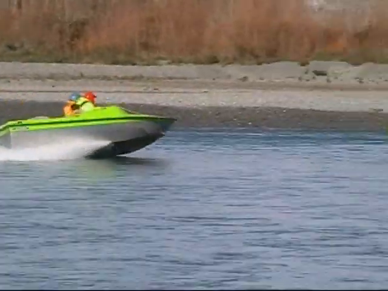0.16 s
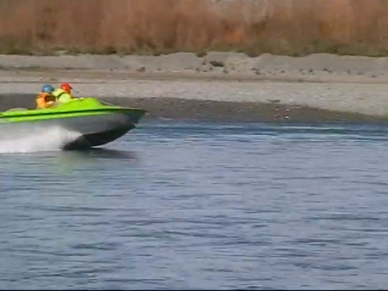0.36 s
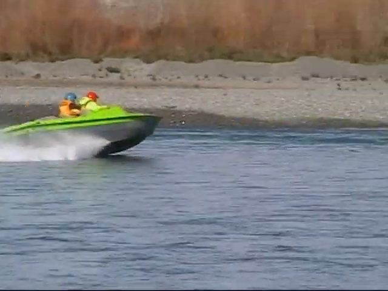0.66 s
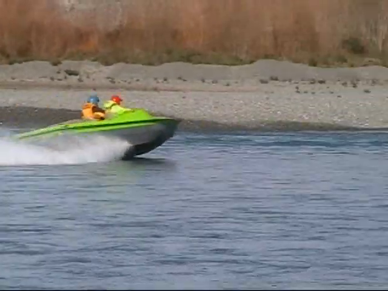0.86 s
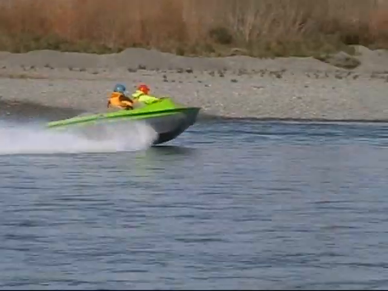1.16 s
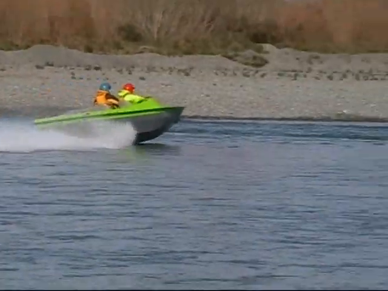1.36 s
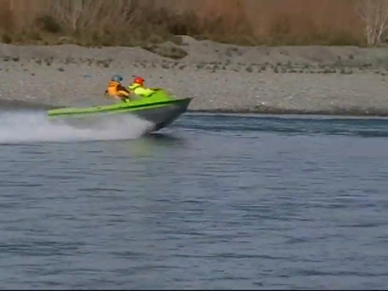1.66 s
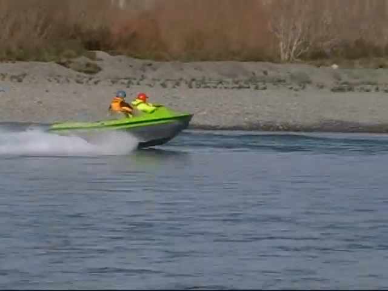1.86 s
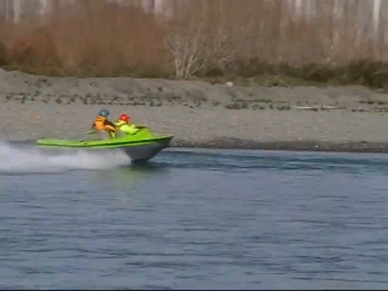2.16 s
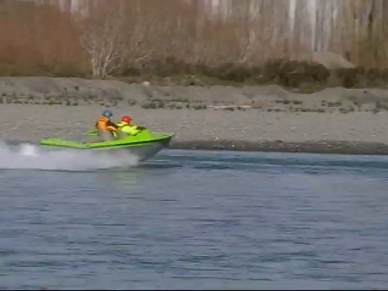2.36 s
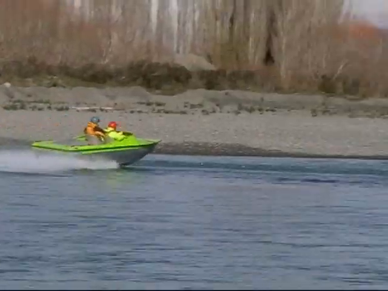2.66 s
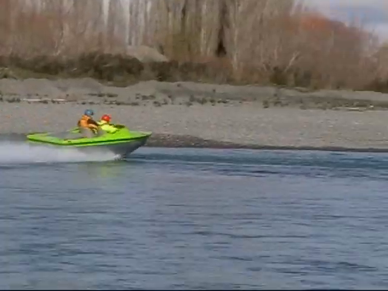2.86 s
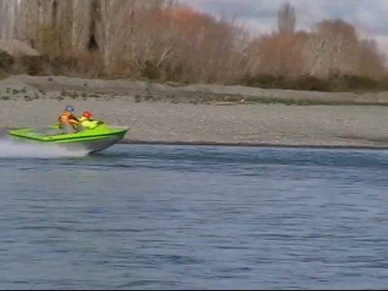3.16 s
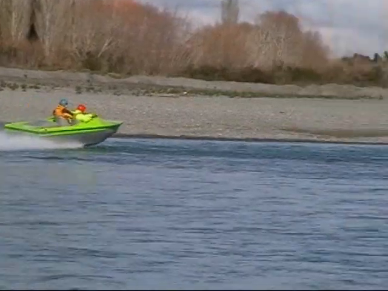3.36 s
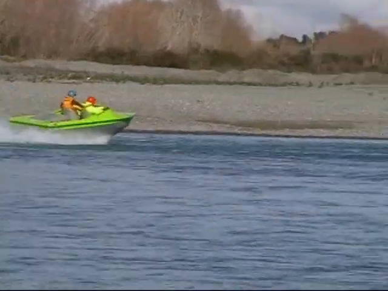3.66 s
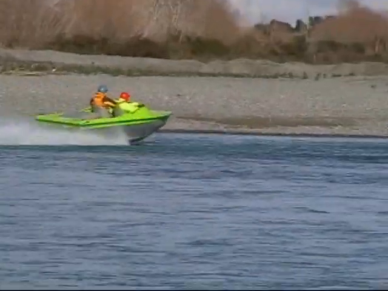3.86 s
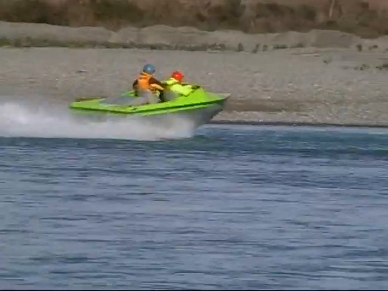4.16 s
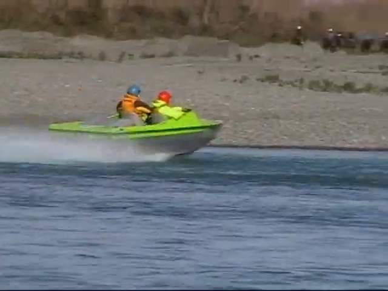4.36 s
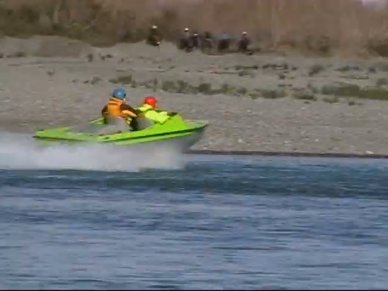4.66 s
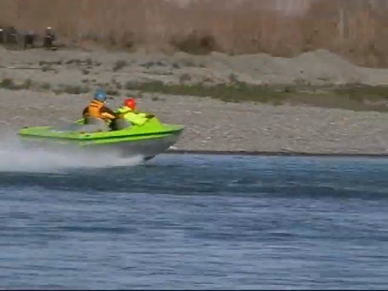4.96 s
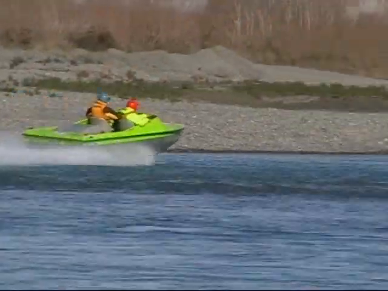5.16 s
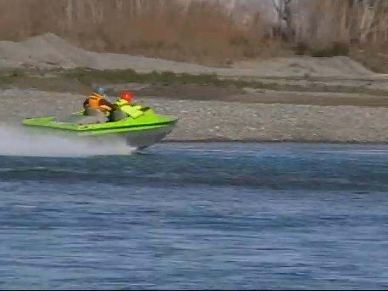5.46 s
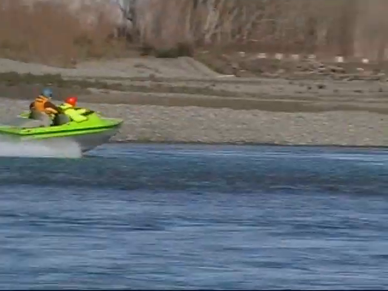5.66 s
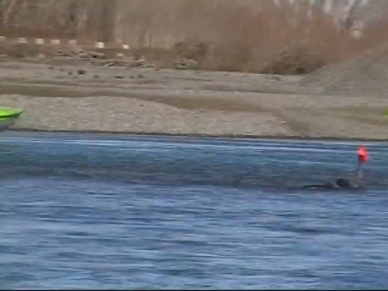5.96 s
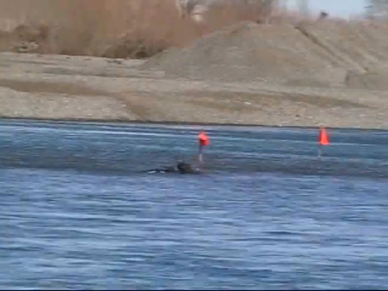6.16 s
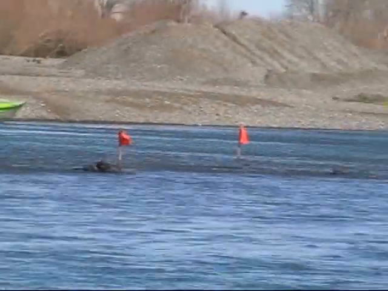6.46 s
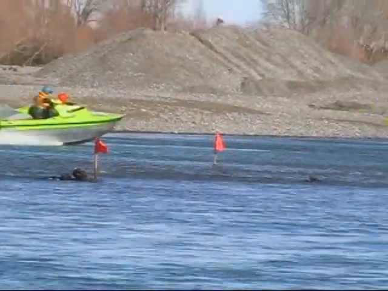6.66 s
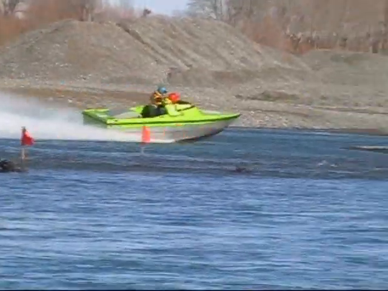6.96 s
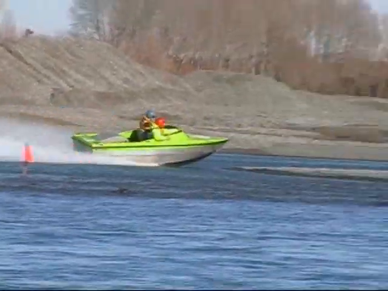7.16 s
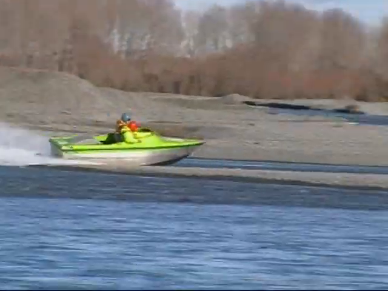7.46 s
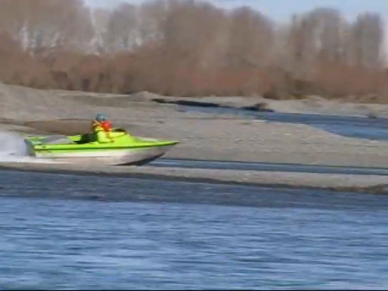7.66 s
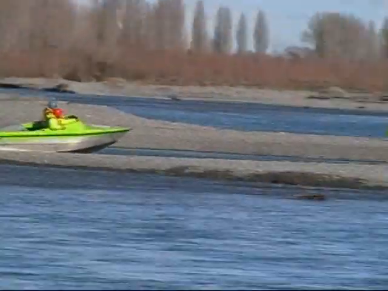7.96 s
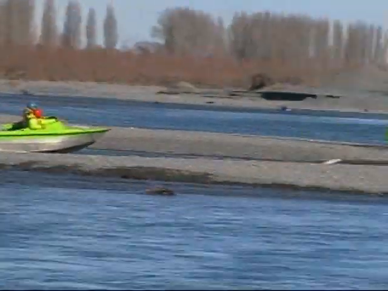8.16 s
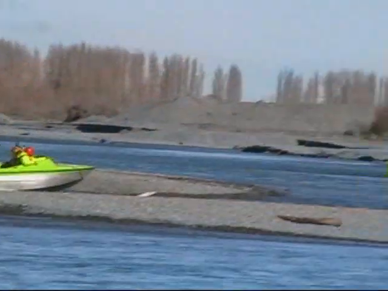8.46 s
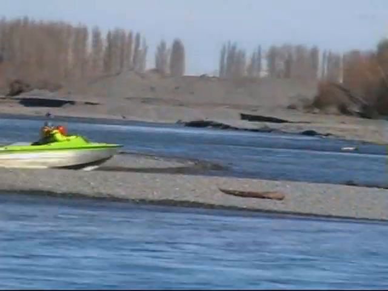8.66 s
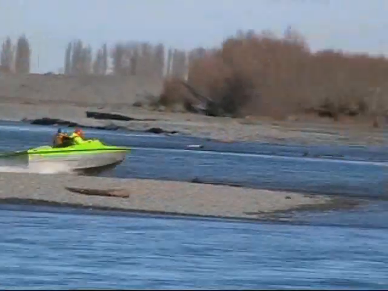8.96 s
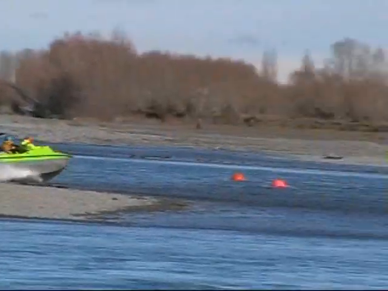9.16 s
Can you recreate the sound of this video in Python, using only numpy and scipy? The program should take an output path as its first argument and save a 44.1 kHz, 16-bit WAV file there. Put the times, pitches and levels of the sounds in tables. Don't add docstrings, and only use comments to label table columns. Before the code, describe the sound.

From an open riverbank, a jet boat with open eight-cylinder exhaust roars past without stopping. A deep, buzzing drone holds nearly steady, sagging slightly in pitch midway then creeping back up. Rough barks and metallic pipe rings ride over it, with spray hiss bright at first, duller as it draws off, then fresher splashes near the end. Light wind bumps the microphone.

```python
import sys
import numpy as np
from scipy import signal
from scipy.io import wavfile

SR = 44100
rng = np.random.default_rng(int(sys.argv[2]) if len(sys.argv) > 2 else 0)


def dump_mix(stems):
    frames = np.atleast_2d(stems).T
    limited = np.clip(frames, -1, 1)
    pcm = np.round(limited * 32767).astype(np.int16)
    wavfile.write(sys.argv[1], SR, pcm)


def field_ratio(decibels):
    return 10 ** (np.asarray(decibels, dtype=float) / 20)


N = 410571

# place [cycles, 0-1], level_db [dB], crack_db [dB]
BLOW_DOWNS = [
    (.925, -1, 7),
    (.47, -3.5, -9.5),
    (.12, -5.5, -17.5),
    (0.5, -20.5, -10),
    (0.5, -21, -17.5),
]
# time_s [s], share [0-1]
MOUTH_FACING = [(0, 0), (1.5, 0.38), (1.9, 0.72), (2.6, 1), (6.2, 1), (6.8, 0.96), (7.4, 1), (8.2, 0.55),
                (9.31, 0.09)]
# time_s [s], gain_db [dB]
DISTANCE_LOSS = [(0, 0), (1.1, -2.5), (2.4, -3.5), (3.8, -9), (5.4, -12), (6.5, -14.5), (7.8, -9),
                 (8.3, -7), (9.31, -10)]
# time_s [s], half_length_s [s], jet_swell_db
# [dB], splash_db [dB], splash_hz [Hz]
WATER_SHEETS = [(.2, .25, -1, -41, 3200), (1.4, 0.11, 4, -36.5, 2860), (1.8, 0.47, -1, -43.5, 2850),
                (2.05, 0.053, 0.5, -50, 4300), (2.5, 0.027, 5, -53, 4960), (2.91, 0.049, 5, -42, 4540),
                (3.5, 0.27, 0, -52.5, 3300), (4.0, .1, 1, -47.5, 3500), (4.355, 0.078, 4.5, -42.5, 3850),
                (3.74, 0.14, -3, -45.5, 1650), (4.406, 0.33, 2.5, -43.5, 1570), (5.5, 0.18, 4, -51.5, 3400),
                (5.7, 0.044, -4, -73, 3500), (5.93, 0.082, 4, -58, 3300), (6.26, 0.071, 3, -61, 3500),
                (7.33, 0.22, 0, -45, 3550), (8.02, .06, -1, -40.5, 3750), (8.25, 0.19, -0.5, -39, 3300),
                (8.3, 0.23, 4.5, -45, 1780), (8.72, 0.11, 8.5, -39.5, 3630), (8.75, .2, 0.5, -43, 1900),
                (8.88, 0.054, -1, -38.5, 4200), (9.1, 0.18, 1.5, -46, 4500)]


def in_time(rows):
    s, *columns = np.transpose(rows)
    return [np.interp(np.arange(N) / SR, s, c) for c in columns]


def swells(rows):
    t, out = np.arange(0, N, 64) / SR, 0
    for s, half_s, *sizes in rows:
        hump = np.exp(-((t - s) / half_s) ** 2)
        out = out + np.outer(sizes, hump)
    return [np.interp(np.arange(N) / SR, t, track) for track in out]


def rms_one(x):
    return x / np.sqrt(np.mean(x ** 2) + 1e-20)


def drift(rate):
    r = np.exp(-80 * np.pi * rate / SR)
    white = rng.standard_normal(N // 40 + 2002)
    slow = signal.lfilter([1], [1, -2 * r, r * r], white)[2000:]
    return np.interp(np.arange(N) / 40, np.arange(len(slow)), rms_one(slow))


def band(x, low_hz, high_hz):
    return signal.sosfilt(signal.butter(2, [low_hz, high_hz], "band", fs=SR, output="sos"), x)


def banded_noise(spectrum, low_hz, count, patchy_db, extra_db):
    edges = low_hz * 2 ** (np.arange(count + 1) / 3)
    point_hz, point_db = np.transpose(spectrum)
    white, together = rng.standard_normal((2, N)), drift(16.0)
    out, power = 0, 0
    for k, (low, high) in enumerate(zip(edges, edges[1:])):
        hz = np.sqrt(low * high)
        level_db = np.interp(np.log(hz), np.log(point_hz), point_db)
        part = field_ratio(level_db) * band(white[k % 2], low, high)
        power += np.mean(part ** 2)
        flicker_db = patchy_db * (.4 * together + drift(2.3))
        out = out + part * field_ratio(extra_db(hz) + flicker_db)
    return out / np.sqrt(power)


def both_db(a_db, b_db):
    return 10 * np.log10(field_ratio(2 * a_db) + field_ratio(2 * b_db))


def exhaust():
    # time_s [s], rate_hz [cycles/s]
    revs = [(0, 38.3), (.65, 38.1), (1.35, 37.91), (2.05, 37.63), (2.4, 37.51), (2.75, 37.53), (3.8, 37.38),
            (4.5, 37.23), (4.8, 37.18), (5.05, 37.25), (5.5, 37.17), (6.25, 37.2), (6.8, 37.26),
            (7.1, 37.13), (7.65, 37.49), (8.35, 37.79), (8.7, 37.84), (9.31, 37.9)]
    # time_s [s], edge_hz [Hz], leak_db round the edge [dB], tilt_db [dB/octave]
    shade = [(0, 745, 0, 1), (.4, 730, 2, 1), (.9, 674, 0.5, -1), (1.4, 694, -24, -1), (2.2, 700, -14, 0),
             (2.6, 750, -12, 0), (3.5, 763, -8, 1.5), (4.3, 915, -14, -2), (5, 980, -13, -4),
             (5.5, 1060, -14, -0.5), (6, 1050, -20, -2.5), (6.6, 1090, -19, 0.5), (7.1, 1270, -26, 0),
             (7.9, 1350, -17, -2), (8.3, 905, -30, 1.5), (8.7, 880, -4.5, -6), (9.31, 740, -5, -4)]
    # time_s [s], level_db [dB]
    loudness = [(0.0, -9), (0.02, -11.5), (0.77, -10.5), (2.59, -11), (2.9, -14), (5.03, -14), (5.16, -18),
                (5.5, -12.5), (5.88, -17), (6.12, -14.5), (6.66, -15.5), (6.95, -13.5), (7.26, -19),
                (7.68, -13), (7.98, -14), (8.4, -10.5), (9.21, -10.5), (9.31, -9.5)]
    # time_s [s], half_length_s [s], gain_db [dB]
    beats = [(.3, .15, 3), (1.5, 0.18, 6), (2.4, 0.24, -4), (3.4, 0.54, 3), (4.2, .12, -3),
             (4.54, 0.063, 7.5), (5.15, 0.077, 7), (5.75, .08, 6), (6.2, 0.37, 2.5), (6.82, 0.087, 4.5),
             (6.98, 0.045, 2), (7.67, 0.08, 1.5), (8.0, 0.15, 4), (8.77, 0.073, -16), (9.0, 0.11, -17.5),
             (9.3, .1, 1.5)]
    # pitch_hz [Hz], density_db [dB per Hz]
    roar_spectrum = [(60, -44), (85, -20.5), (120, -13), (200, 0.5), (300, 2.5), (500, 2.5), (800, -5.5),
                     (1300, -25), (2200, -8.5)]

    rate, = in_time(revs)
    shading = in_time(shade)
    turns = .15 + np.cumsum(rate) / SR
    bark_db, elbow_db, tail_db, crack_db = mouth(shading[0])

    (fifth_db,), (facing,) = in_time(loudness), in_time(MOUTH_FACING)
    third_db = -26 - 9 * facing
    sixth_db = fifth_db - 11 + swells(beats)[0] + 1.5 * drift(6.0)
    low_orders = boom(turns, [third_db, fifth_db, sixth_db])

    soft = blow_downs(turns, column=1, spread_db=1.5)
    sharp = blow_downs(turns, column=2, spread_db=1.3)
    roar = banded_noise(roar_spectrum, 57.46, count=16, patchy_db=1.5,
                        extra_db=lambda hz: shade_db(hz, *shading))
    gusty_roar = roar * puffs(soft, decay_s=.006, steady=4)
    barking = field_ratio(-4.0) * bark(turns, rate, shading) + field_ratio(-6.5) * gusty_roar

    elbow = field_ratio(elbow_db - 5) * pipe(soft, 800, 1100, hiss_db=-3)
    tail = field_ratio(tail_db - 1) * pipe(soft + .6 * sharp, 1170, 1520, hiss_db=-4)
    spit = rng.standard_normal(N) * puffs(sharp, decay_s=0.0013, steady=.02)
    spit = rms_one(band(spit, 2200, 5800))
    crack = field_ratio(crack_db - 4) * (pipe(sharp, 1970, 2786, hiss_db=6.0) + field_ratio(-11.5) * spit)
    return low_orders + field_ratio(bark_db) * barking + elbow + tail + crack


def boom(turns, levels_db):
    favoured = [
        (3, .14),
        (5, 0),
        (6, .7),
    ]
    # order [per cycle], level_db [dB]
    faint = [(2, -53.5), (4, -44)]
    out = sum(field_ratio(db) * np.cos(2 * np.pi * k * turns) for k, db in faint)
    for (k, lead), db in zip(favoured, levels_db):
        phase = 2 * np.pi * (k * turns + lead) + 0.051 * drift(1.9)
        out = out + field_ratio(db + .5 * drift(27.0)) * np.cos(phase)
    return np.sqrt(2) * out


def bark(turns, rate, shading):
    # order [per cycle], level_db [dB]
    orders = [(1, -52), (2, -36), (3, -21), (4, -26), (5, 0), (6, -8), (7, -18.5), (8, -12), (9, -18),
              (10, -9.5), (11, -7.5), (12, -29.5), (13, -8), (14, -24.5), (15, -14.5), (16, -23),
              (17, -11.5), (18, -14.5), (19, -21.5), (20, -18.5), (21, -32.5), (22, -18), (23, -37.5),
              (24, -45.5), (25, -33.5), (26, -27.5), (27, -35.5), (28, -22.5), (29, -45), (30, -28.5),
              (31, -32.5), (32, -38.5), (33, -35.5), (34, -47.5), (35, -34.5), (36, -50.5), (37, -47),
              (38, -47)]
    out, top_db = 0, max(db for k, db in orders if k > 6)
    shiver = turns + .001 * drift(25)
    for k, db in orders[6:]:
        pair = sum(field_ratio(size) * np.exp(-2j * np.pi * k * place) for place, size, _ in BLOW_DOWNS[:2])
        waver_db, waver_rad = 1.4 * drift(2.5), .55 * drift(.8)
        shading_db = shade_db(k * rate, *shading) - shade_db(k * 34.7, 1050, -18, 0)
        phase = 2 * np.pi * k * shiver + np.angle(pair) + 14.7 / k + waver_rad
        out = out + field_ratio(db - top_db + shading_db + waver_db) * np.cos(phase)
    return out


def blow_downs(turns, column, spread_db):
    clicks = np.full(N, 1e-18)
    chance = rng.standard_normal((int(turns[-1]) + 2, len(BLOW_DOWNS), 2))
    for j, row in enumerate(BLOW_DOWNS):
        due = np.arange(len(chance)) + row[0] + 0.00056 * chance[:, j, 0]
        inside = due < turns[-1]
        at = np.searchsorted(turns, due[inside])
        clicks[at] += field_ratio(row[column] + spread_db * chance[inside, j, 1])
    return clicks


def puffs(clicks, decay_s, steady):
    rush = signal.lfilter([1], [1, -np.exp(-1 / (decay_s * SR))], clicks)
    return rms_one(rms_one(rush) + steady)


def pipe(clicks, low_hz, high_hz, hiss_db):
    blown = band(band(rng.standard_normal(N), low_hz, high_hz), 0.97 * low_hz, 1.13 * high_hz)
    struck = band(band(clicks, low_hz, high_hz), 0.81 * low_hz, 1.13 * high_hz)
    hiss = field_ratio(hiss_db) * rms_one(blown) * puffs(clicks, decay_s=0.0012, steady=1.7)
    return rms_one(rms_one(struck) + hiss)


def mouth(edge_hz):
    # time_s [s], half_length_s [s], bark_db [dB], ring_db [dB], crack_db [dB]
    lifts = [(.4, 0.081, -1, 2, 2), (.65, .15, -2.5, 6.5, 6.5), (1.01, 0.18, 0.5, 4.5, -1.5),
             (1.37, 0.17, 1.5, 5, -4.5), (2.05, 0.17, -1.5, 2, -2.5), (2.55, 0.078, 2.5, -0.5, 7.5),
             (3.2, .2, 0, 5, 1), (3.48, 0.099, -0.5, -3.5, -7), (4.2, 0.048, 3, -3, -2),
             (8.07, .08, 0, -0.5, 2), (5.75, 0.052, -3.5, -15, -1), (4.65, 0.1, 2.5, 6, 8.5),
             (4.95, 0.13, -1, -3.5, 4.5), (5.18, 0.13, -1, -0.5, 10.5), (5.5, 0.22, 1.5, -1, 11),
             (5.92, 0.094, 1, 8.5, 12.5), (6.15, 0.14, 1, -4, 8.5), (6.99, 0.023, -0.5, 5.5, 3),
             (7.2, 0.04, 1.5, 8, -12), (7.79, 0.091, 0, 6.5, -1), (8.25, 0.067, -2.5, 1.5, 3.5),
             (8.79, 0.17, 0.5, 1, 3.5), (8.95, 0.13, 1.5, -1, 1.5), (9.25, 0.069, -1, 4.5, 11.5)]
    (facing,), (far_db,) = in_time(MOUTH_FACING), in_time(DISTANCE_LOSS)
    bark_lift, ring_lift, crack_lift = swells(lifts)
    elbow_fading_db = -19 - 12 * np.arange(N) / SR
    elbow_db = both_db(elbow_fading_db, -31 + shade_db(980, edge_hz, -24, 0))
    tail_db = both_db(-28 + 2.3 * far_db, -41.5 + shade_db(1400, edge_hz, -31.5, 0))
    bark_db = -23.5 + 5.5 * facing + bark_lift
    crack_db = -35 + 0.81 * far_db + crack_lift
    return bark_db, elbow_db + ring_lift, tail_db + 1.3 * ring_lift, crack_db


def shade_db(hz, edge_hz, leak_db, tilt_db):
    passed = 1 / (1 + (hz / edge_hz) ** 15.4)
    slope_db = tilt_db * np.log2(np.clip(hz, 200, 900) / 450)
    return 10 * np.log10(passed + field_ratio(2 * leak_db)) + slope_db


def spray():
    # pitch_hz [Hz], density_db [dB per Hz]
    hiss_spectrum = [(700, -8.5), (1100, -13), (1400, -17.5), (1750, -4.5), (2300, -23), (3500, -11),
                     (5000, -13.5), (6500, -17), (7500, -28), (8300, -39)]
    # time_s [s], extra path_ms [ms], strength [0-1]
    mirror = [(0, .66, .1), (1.2, .6, 0), (2, .565, 0.4), (2.7, 0.516, 0.6), (3.5, .475, 0.66),
              (3.7, .46, .1), (3.9, 0.25, .15), (5.2, 0.28, 0.2), (6.4, .24, 0.7), (6.7, .25, 0.2),
              (6.9, 0.39, 0.4), (7.5, 0.33, 0.13), (9.31, 0.48, 0.03)]
    (far_db,), (jet_lift,) = in_time(DISTANCE_LOSS), swells([row[:3] for row in WATER_SHEETS])
    level_db, splash_db = -39 + far_db + jet_lift, -38 + 0.55 * far_db
    tilt_db = 1.6 + 0.32 * far_db - 0.26 * np.arange(N) / SR
    hiss = banded_noise(hiss_spectrum, 738, count=11, patchy_db=1.56,
                        extra_db=lambda hz: tilt_db * np.log2(max(hz, 2500) / 5000))

    path_ms, strength = in_time(mirror)
    mirrored = np.interp(np.arange(N) - path_ms * SR / 1000, np.arange(N), hiss)
    glance = signal.butter(2, [2400, 7200], "band", fs=SR, output="sos")
    combed = hiss - np.clip(strength, 0, 1) * signal.sosfiltfilt(glance, mirrored)
    splash = rms_one(band(rng.standard_normal(N), 2800, 4200))
    return field_ratio(level_db + 4.0) * combed + field_ratio(splash_db - 9) * splash + sheets()


def sheets():
    t, wet, out = np.arange(N) / SR, rng.standard_normal(N), 0
    for s, half_s, _, db, hz in WATER_SHEETS:
        hump = np.exp(-((t - s) / half_s) ** 2)
        out = out + field_ratio(db) * hump * rms_one(band(wet, hz / 1.14, hz * 1.14))
    return out


def slap():
    # start_s [s], peak_db [dB], low_hz [Hz], high_hz [Hz]
    knocks = [
        (8.012, -27, 1284, 2030),
    ]
    out, wet = 0, rng.standard_normal(N)
    for s, db, low_hz, high_hz in knocks:
        t = np.arange(N) / SR - s
        decay = (t > 0) * np.exp(-np.abs(t) / 0.0064)
        out = out + field_ratio(db) * decay * rms_one(band(wet, low_hz, high_hz))
    return out


def wind():
    # time_s [s], level_db [dB]
    breeze = [(0, -60), (1, -73.5), (3, -77), (5.5, -63), (7.6, -52.5), (8.4, -56.5), (9.31, -64)]
    # time_s [s], half_length_s [s], gain_db [dB]
    gusts = [(0, 0.089, 14), (.4, .2, 16), (1.2, .25, 8.5), (.67, .06, 17), (1.89, 0.17, 14.5),
             (4.43, 0.086, 8), (5.08, .15, 5), (7.86, 0.075, 21), (8.11, 0.05, 4), (8.58, .1, 11),
             (8.87, .08, 9), (9.31, .1, 11)]
    # time_s [s], peak_db [dB], pitch_hz [Hz]
    thumps = [
        (7.853, -33, 55),
        (8.06, -35, 80),
    ]
    level_db = in_time(breeze)[0] + swells(gusts)[0]
    mid, side = band(rng.standard_normal((2, N)), 22, 110)
    lumps = field_ratio(level_db + 5 + 1.4 * drift(8.5))
    out = lumps * (rms_one(mid) + field_ratio(-14) * rms_one(side) * [[1], [-1]])
    t, gust = np.arange(N) / SR, rng.standard_normal(N)
    for s, db, hz in thumps:
        hump = np.exp(-((t - s) / .025) ** 2)
        out = out + field_ratio(db) * hump * rms_one(band(gust, .5 * hz, 1.8 * hz))
    return out


def scene():
    # time_s [s], left minus right [dB]
    boat_pan = [
        (0, 0),
        (4, 1),
        (9.31, 1.75),
    ]
    boat = exhaust() + spray() + slap()
    boat = boat + field_ratio(-13) * band(np.roll(boat, round(.00156 * SR)), 1800, 8000)
    pan_db, = in_time(boat_pan)
    low_scatter = field_ratio(-37) * band(np.roll(boat, 900), 60, 500)
    high_scatter = field_ratio(-22) * band(np.roll(boat, 1400), 2200, 6000)
    direct = boat * field_ratio(pan_db * [[.5], [-.5]])
    return direct + (low_scatter + high_scatter) * [[1], [-1]] + wind()


def band_limit(x):
    return signal.sosfilt(signal.butter(12, 8300, fs=SR, output="sos"), x)


def record(dry):
    rounded = 1.192 * np.tanh(dry / 1.174)
    x = signal.sosfilt(signal.butter(3, 48.0, "high", fs=SR, output="sos"), rounded)
    x = signal.sosfiltfilt(signal.cheby2(10, 25, 8290, fs=SR, output="sos"), x)
    return band_limit(x)


dry = scene()
out = record(dry)
dump_mix(out)
```